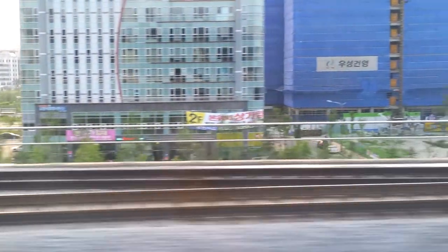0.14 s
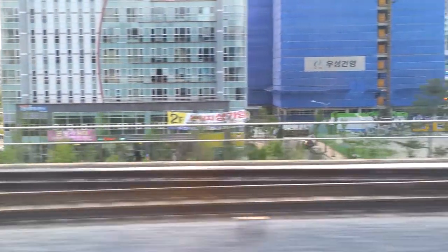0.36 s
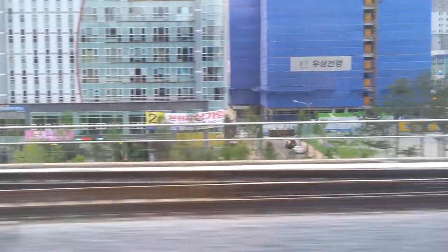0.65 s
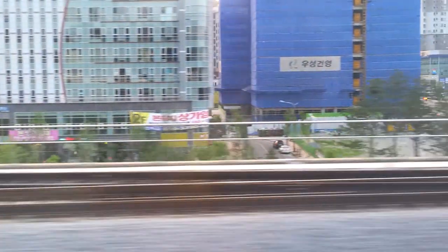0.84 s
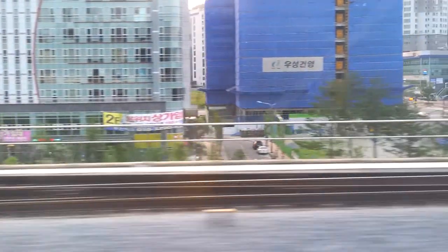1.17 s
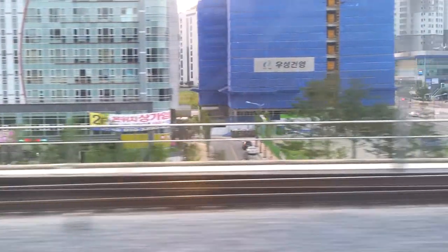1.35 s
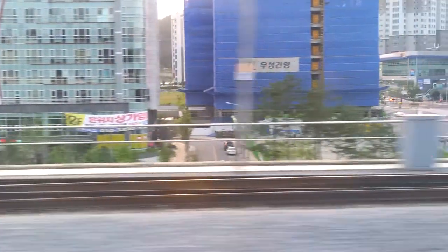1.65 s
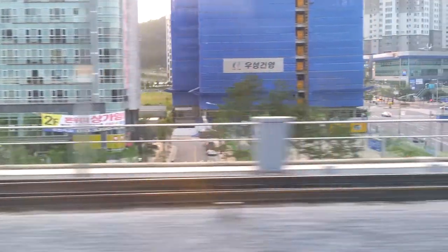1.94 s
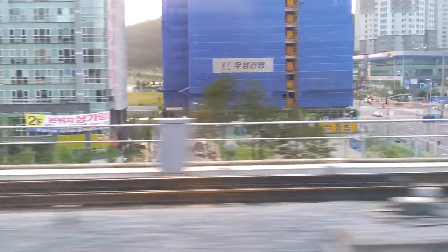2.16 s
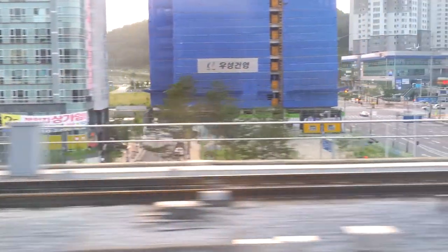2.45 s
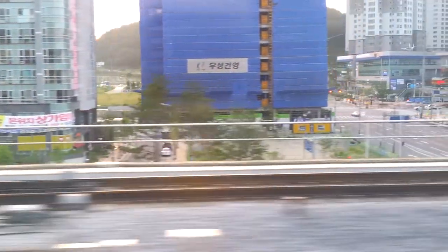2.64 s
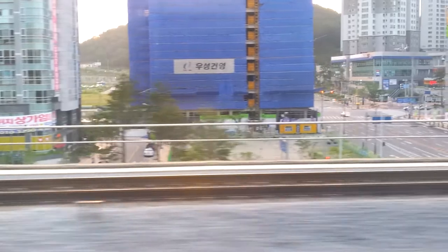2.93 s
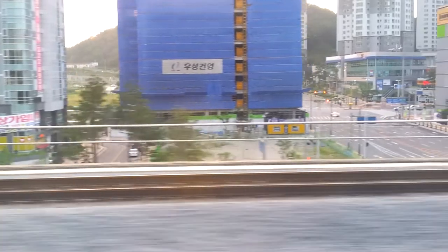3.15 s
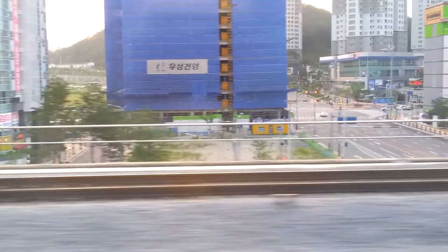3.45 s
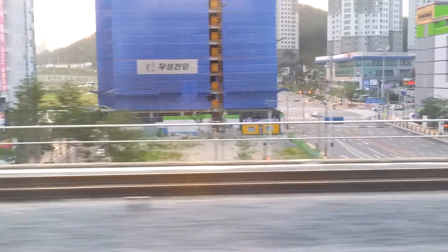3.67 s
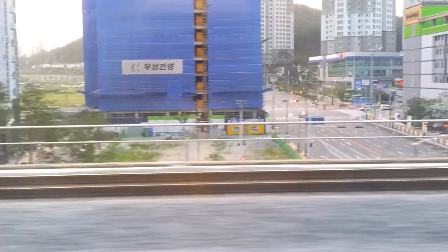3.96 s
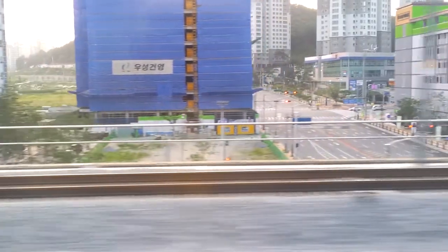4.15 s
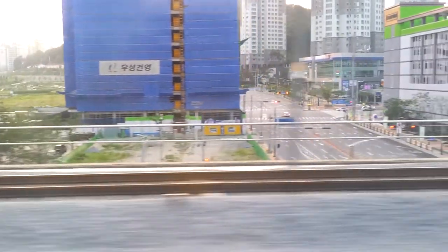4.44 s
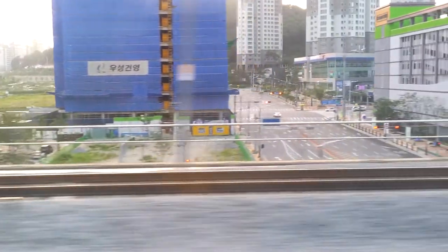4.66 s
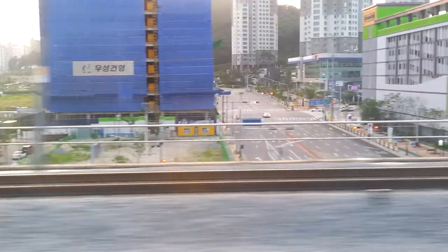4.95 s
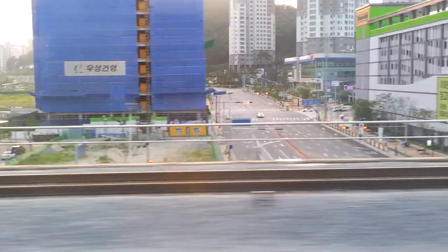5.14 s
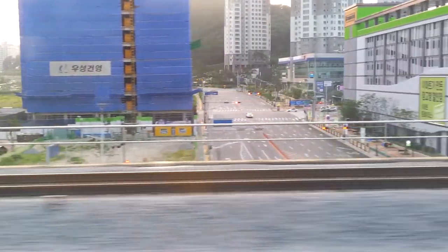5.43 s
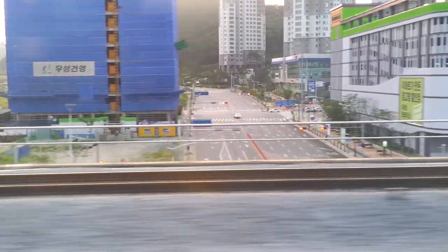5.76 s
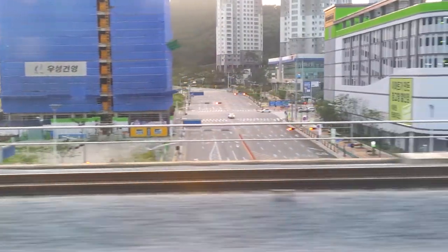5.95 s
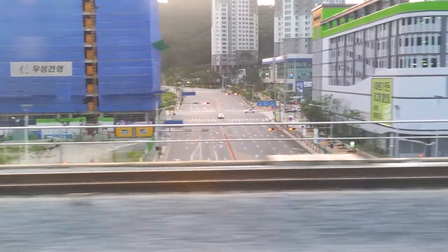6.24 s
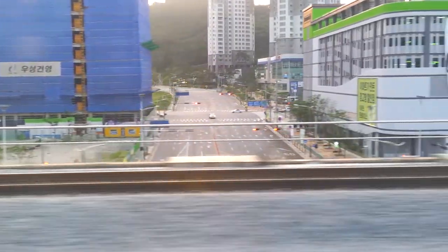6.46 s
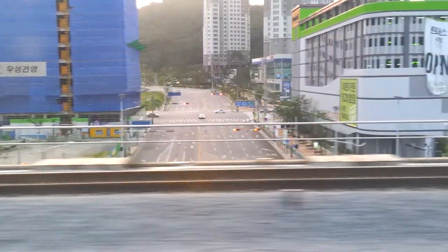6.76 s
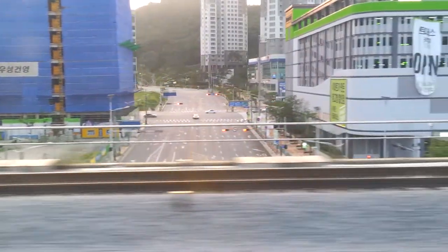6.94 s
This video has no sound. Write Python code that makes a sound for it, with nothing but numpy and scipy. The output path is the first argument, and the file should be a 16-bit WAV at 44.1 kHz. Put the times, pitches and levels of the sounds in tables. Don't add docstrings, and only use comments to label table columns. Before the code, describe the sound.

Inside a smoothly running fast train, a deep rumbling roar and a throbbing low hum fill the cabin, with faint rustles, ticks and small pings.

```python
import sys
import numpy as np
from scipy import signal
from scipy.fft import rfft, irfft
from scipy.io import wavfile
from scipy.ndimage import uniform_filter1d

SR = 44100
rng = np.random.default_rng(int(sys.argv[2]) if len(sys.argv) > 2 else 0)


def rack_gain(trim_db):
    fader = np.asarray(trim_db, float)
    return 10 ** (fader / 20)


def wrap_up_sound(samples):
    columns = np.atleast_2d(samples).T
    tamed = np.clip(columns, -1, 1)
    steps = np.round(tamed * 32767).astype(np.int16)
    wavfile.write(sys.argv[1], SR, steps)


N = 313110
T = np.arange(N) / SR
HZ = np.fft.rfftfreq(N, 1 / SR) + 1e-9

# [f/Hz, rms level/dB]
MOTORS = [
    (59.173, -38.5),
    (58.239, -41.9),
]
# [multiple of shaft frequency, rms level/dB]
MOTOR_ORDERS = [(2, -56), (3, -54), (4, -49)]
IN_STEP_S = .215
# [multiple of ripple frequency, rms level/dB]
HUM = [(1, -55), (3, -46.6), (6, -63.5), (7, -65.2), (8, -78), (9, -69), (10, -77.5), (11, -69.5),
       (12, -70.1), (13, -83), (14, -81.5), (19, -85)]
RIPPLE_HZ = 119.97

# [f/Hz, spectral level/dB per Hz]
ROAR = [(28, -38), (40, -34), (55, -10.5), (82, -12.5), (140, -9.5), (250, -5.5), (315, -8), (345, -14),
        (600, -23), (760, -27.5), (1500, -38), (3000, -45.5), (7000, -51), (10000, -59)]
ROAR_DB = -32
# [f/Hz, width/Hz, peak
# level/dB per Hz]
CABIN_MODES = [(65.6, 15, -1), (89.2, 4, -14), (123, 5.9, -4.5), (152.4, 27, -8), (204.6, 11, -9),
               (230.8, 9.8, -0.5), (278.5, 17.8, -1), (310.8, 23, -7.5), (425, 2, -15), (450, 2.2, -20),
               (502.6, 15.4, -17), (570.7, 24, -18), (649, 9.6, -22.5), (14000, 6, -39),
               (858, 6, -26), (1066, 5, -29), (1125, 7, -34), (2213, 3.6, -27.5)]
# [t/s, level/dB]
ROAR_SWELL = [(0, -33), (.5, -34), (1.0, -33), (1.5, -33), (2.0, -33.5), (2.6, -34), (2.9, -35), (3.55, -32),
              (4.1, -34.5), (4.5, -32.5), (5.1, -35.5), (5.6, -34), (6.1, -34.5), (6.6, -34), (7.1, -34)]
# [f/Hz, share/1, wander/dB]
FOLLOW = [(62, .3, 1.0), (250, 1.0, 1.2), (800, .1, .3), (3500, .0, .3)]

# [t/s, peak level/dB, centre f/Hz, width/Hz, decay t60/s]
RUSTLES = [(.0, -58.5, 3430, 3000, .25), (.925, -48, 1900, 600, 0.081), (1.03, -51, 2200, 1200, .1),
           (1.149, -45.5, 3430, 4500, 0.26), (1.151, -49.5, 1800, 1400, .2), (1.25, -59, 3500, 4000, .55),
           (2.24, -51.5, 4100, 2000, 0.28), (3.41, -48, 4930, 1500, 0.1), (3.79, -51.5, 4200, 3500, .3),
           (4.172, -53, 5200, 1800, 0.13), (4.72, -55, 2800, 1000, .1), (4.95, -53, 3000, 3000, 0.27)]
RISE_PER_T60 = 0.053
# [t/s, peak level/dB, centre f/Hz, width/Hz, decay t60/s]
TICKS = [
    (0.673, -45.5, 5000, 6040, 0.04),
    (.675, -57, 2530, 1600, 0.073),
    (2.533, -50, 5300, 1500, .05),
    (3.44, -52, 3600, 2500, 0.1),
    (4.465, -51.5, 5500, 5000, 0.068),
    (6.801, -51, 2600, 1200, .05),
    (6.879, -50, 2500, 3500, .06),
    (6.88, -59, 7000, 4000, 0.055),
]
TICK_RISE_S = 0.0012
# [t/s, peak level/dB, f/Hz, rise/s, decay t60/s]
PINGS = [(0, -57, 2690, .002, .1), (.004, -52, 4050, .004, .09), (.017, -53, 2720, .003, .22),
         (.037, -59, 4060, .004, .18), (.045, -57, 2770, .003, .12), (.204, -53, 2900, .001, .04),
         (3.408, -58, 5100, .002, .08), (3.424, -57, 5000, .002, .12), (5.682, -51.5, 3610, .002, .09),
         (6.465, -44, 1080, .004, .15), (6.765, -45, 1100, .004, .12)]

# [f/Hz, chance/1]
KEPT = [(2000, 1), (4000, .95), (4800, .86), (6500, .82), (7900, .46), (9200, .14), (11600, .09),
        (14500, .13)]
# [start t/s, end t/s]
FULL_TREBLE = [(0.052, 0.093), (0.267, 0.284), (0.731, 0.801), (1.585, 1.608), (1.718, 1.759),
               (1.863, 1.91), (1.974, 2.014), (2.183, 2.206), (2.763, 2.786), (2.868, 2.937),
               (3.059, 3.106), (3.146, 3.17), (3.872, 3.895), (4.063, 4.11), (4.145, 4.174), (4.255, 4.278),
               (4.743, 4.766), (4.83, 4.876), (4.957, 5.149), (5.3, 5.323), (5.764, 5.817), (6.049, 6.177),
               (6.217, 6.264), (6.345, 6.391)]
# [start t/s, end t/s, top f/Hz]
SET_TREBLE = [
    (.67, .7, 11500),
    (1.14, 1.2, 9800),
    (1.61, 1.63, 4700),
    (1.81, 1.83, 4700),
    (4.55, 4.59, 3000),
]


def unit(x):
    return x / np.sqrt(np.mean(x ** 2))


def tone(hz, db, start):
    return np.sqrt(2) * rack_gain(db) * np.cos(2 * np.pi * hz * (T - start))


def motors():
    shafts = sum(tone(hz, db, IN_STEP_S) for hz, db in MOTORS)
    shaft_hz = MOTORS[0][0]
    overtones = sum(tone(k * shaft_hz, db, rng.random()) for k, db in MOTOR_ORDERS)
    return shafts + overtones


def hum():
    return sum(tone(k * RIPPLE_HZ, db, rng.random()) for k, db in HUM)


def resonance(hz, width):
    return 1 / (1 + ((HZ ** 2 - hz ** 2) / (HZ * width)) ** 2)


def walk(rate):
    hold = int(SR / rate)
    steps = np.repeat(rng.standard_normal(N // 500), hold)[:N]
    return unit(uniform_filter1d(uniform_filter1d(steps, hold), hold))


def roar(flicker_db=0.5, top_db=-70):
    hz, db = np.transpose(ROAR)
    power = rack_gain(2 * np.interp(np.log(HZ), np.log(hz), db, left=-90, right=top_db))
    for f, width, peak_db in CABIN_MODES:
        power = power + rack_gain(2 * peak_db) * resonance(f, width) ** 2
    steady = rfft(rng.standard_normal(N)) * np.sqrt(power)
    shared_db = np.interp(T, *np.transpose(ROAR_SWELL))
    shared_db = shared_db - shared_db.mean()
    at, follows, wanders = np.transpose(FOLLOW)
    out = 0
    for octave in np.arange(9, 29) / 2:
        share = np.cos(np.pi * np.clip(np.log2(HZ) - octave, -.5, .5)) ** 2
        follow = np.interp(octave, np.log2(at), follows)
        wander_db = np.interp(octave, np.log2(at), wanders)
        swell_db = follow * shared_db + wander_db * walk(3) + flicker_db * walk(9)
        out = out + irfft(steady * share, N) * rack_gain(swell_db)
    return rack_gain(ROAR_DB) * unit(out)


def burst(rise, t60):
    t = np.arange(SR // 2) / SR
    return (1 - np.exp(-t / max(rise, 1e-4))) * 1000 ** (-t / t60)


def rustles(grain_db=1.3):
    out = np.zeros(N + SR)
    grains = rng.standard_normal(N) * rack_gain(grain_db * walk(80))
    grains = np.pad(grains, (0, SR), "wrap")
    events = [(*tick, TICK_RISE_S) for tick in TICKS]
    events += [(*rustle, RISE_PER_T60 * rustle[-1]) for rustle in RUSTLES]
    for s, db, hz, width, t60, rise in events:
        start = int(s * SR)
        span = slice(start, start + SR // 2)
        peak = signal.iirpeak(hz, hz / width, SR)
        band = signal.lfilter(*peak, signal.lfilter(*peak, grains[span]))
        out[span] += rack_gain(db) * unit(band) * burst(rise, t60)
    return out[:N]


def pings():
    out = np.zeros(N + SR)
    waver = 1 + 0.01 * walk(180)[:SR // 2]
    for s, db, hz, rise, t60 in PINGS:
        ring = np.sin(2 * np.pi * hz * np.cumsum(waver) / SR)
        start = int(s * SR)
        out[start:start + SR // 2] += rack_gain(db) * ring * burst(rise, t60)
    return out[:N]


def treble_dropouts(x):
    hop, grid, top_hz, phone_sr = 1024, 977, 15830, 48000
    shift_hz_per_db = 350
    fast = signal.resample_poly(x, 160, 147, padtype="line")
    bins = np.arange(hop) + .5
    basis = np.cos(np.pi / hop * np.outer(np.arange(2 * hop) + .5 + hop / 2, bins))
    basis *= signal.windows.kaiser_bessel_derived(2 * hop, 4 * np.pi)[:, None]
    padded = np.pad(fast, (2 * hop - grid, 3 * hop), "reflect")
    frames = padded[:len(padded) // hop * hop].reshape(-1, hop)
    coefs = np.hstack([frames[:-1], frames[1:]]) @ basis
    centre = ((np.arange(len(coefs)) - 1) * hop + grid) / phone_sr
    hz = bins * phone_sr / 2 / hop
    edges = np.r_[80, 88, 96:145:12, 160, 176, 196, 216, 240, 264, 292, 320:hop:32]
    band = np.searchsorted(edges, bins)
    middle = np.bincount(band, hz) / np.bincount(band)
    luck = rng.standard_normal((len(coefs), band.max() + 1))
    luck += .1 * np.roll(luck, 1, axis=0) + .3 * luck[:, :1]
    rank = luck.ravel().argsort().argsort().reshape(luck.shape) / luck.size
    treble = np.mean(coefs[:, (hz > 3000) & (hz < 7000)] ** 2, axis=1)
    bright_db = 10 * np.log10(uniform_filter1d(treble, size=4))
    shift_hz = shift_hz_per_db * (bright_db - np.median(bright_db))[:, None]
    keep = rank <= np.interp(middle - shift_hz, *np.transpose(KEPT))
    for start, end, top in [(a, b, top_hz) for a, b in FULL_TREBLE] + SET_TREBLE:
        keep[(centre >= start) & (centre <= end)] = middle < top
    halves = (coefs * (keep[:, band] & (hz < top_hz))) @ basis.T * 2 / hop
    out = (halves[1:, :hop] + halves[:-1, hop:]).ravel()[hop - grid:]
    return signal.resample_poly(out, 147, 160, padtype="line")[:N]


def scene():
    return (motors() + hum() + roar() + rustles() + pings())[None]


def low_pass(x):
    return signal.sosfilt(signal.butter(12, 16260, fs=SR, output="sos"), x)


def record(dry):
    heard = dry[0] + rack_gain(-61.7) * rng.standard_normal(N)
    fade = np.minimum((T[-1] - T) / 0.0043, 1)
    mix = (treble_dropouts(heard) * fade)[None]
    return low_pass(mix)


dry = scene()
out = record(dry)
wrap_up_sound(out)
```